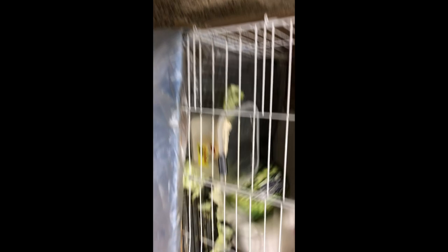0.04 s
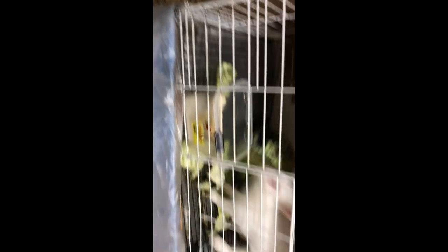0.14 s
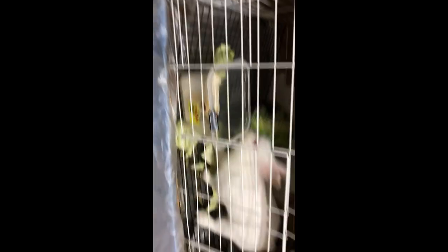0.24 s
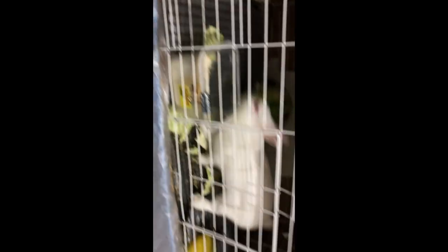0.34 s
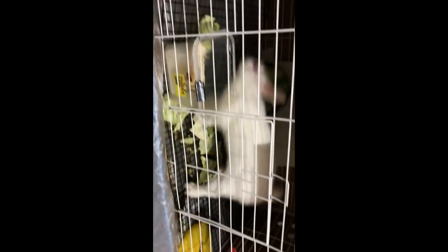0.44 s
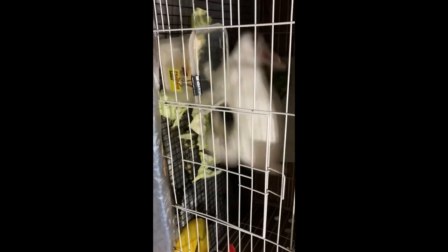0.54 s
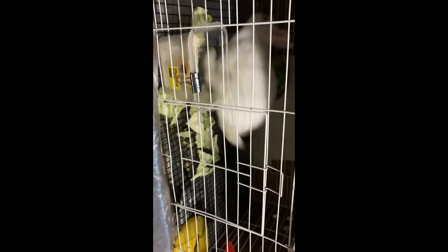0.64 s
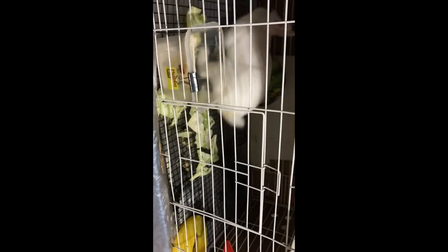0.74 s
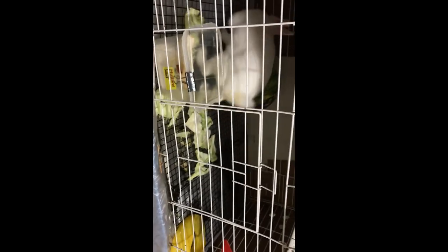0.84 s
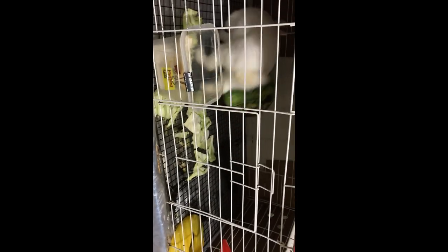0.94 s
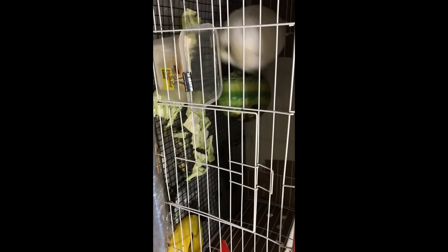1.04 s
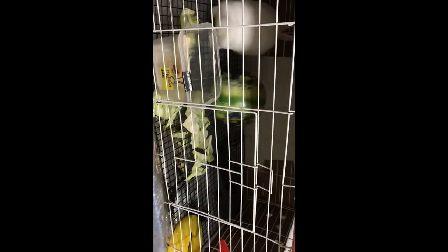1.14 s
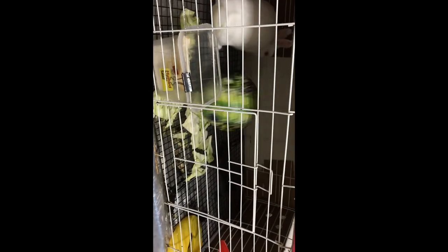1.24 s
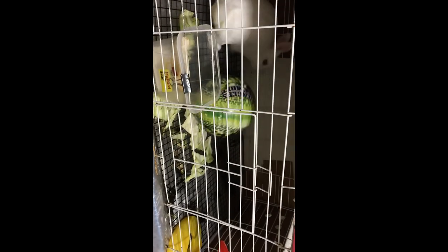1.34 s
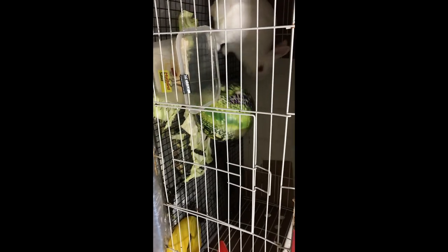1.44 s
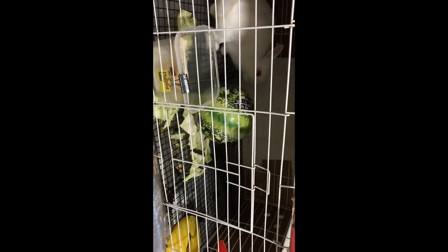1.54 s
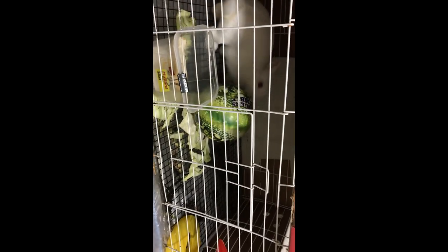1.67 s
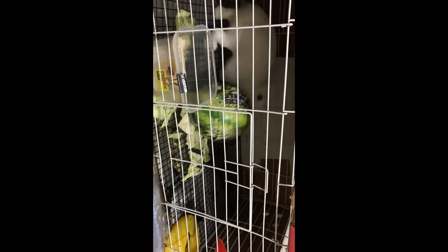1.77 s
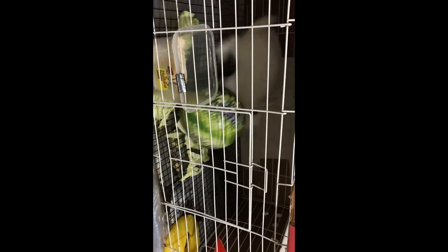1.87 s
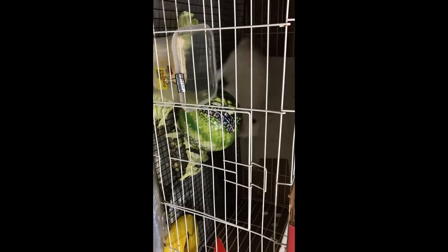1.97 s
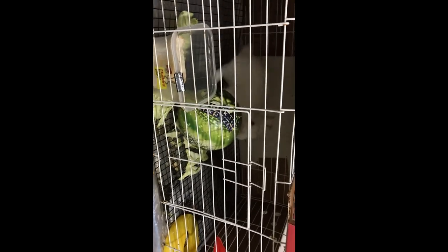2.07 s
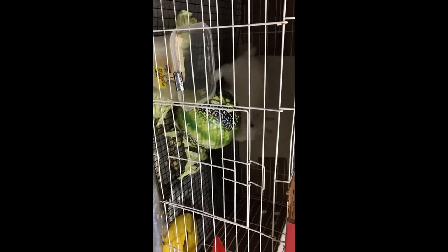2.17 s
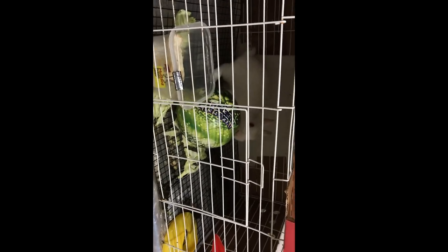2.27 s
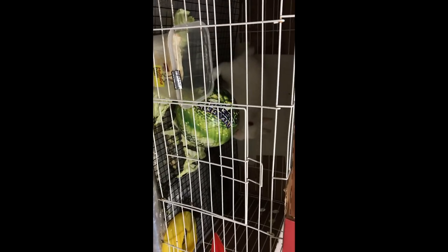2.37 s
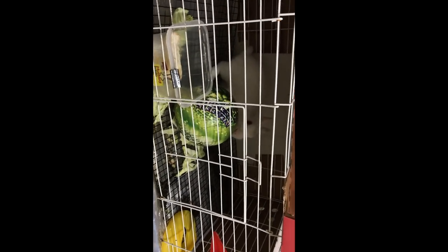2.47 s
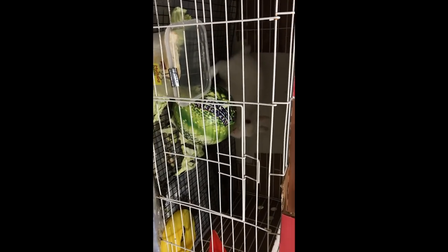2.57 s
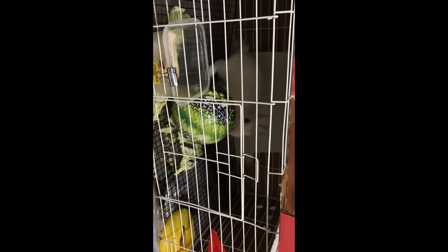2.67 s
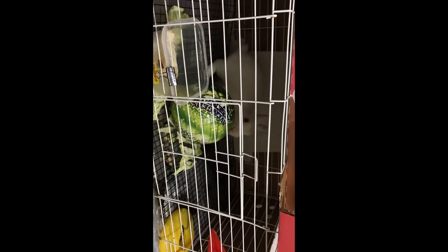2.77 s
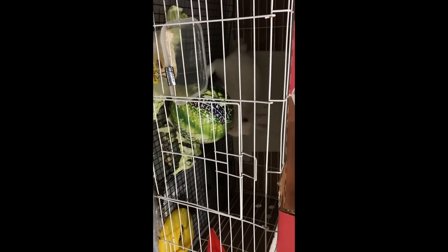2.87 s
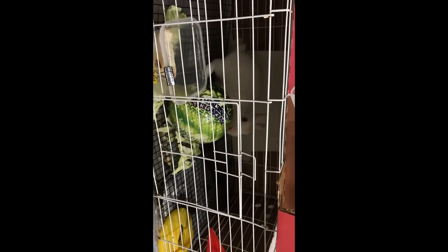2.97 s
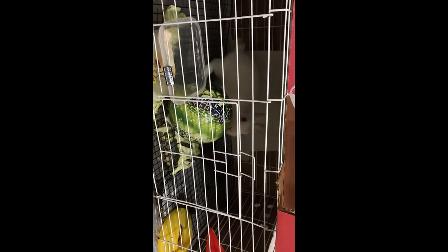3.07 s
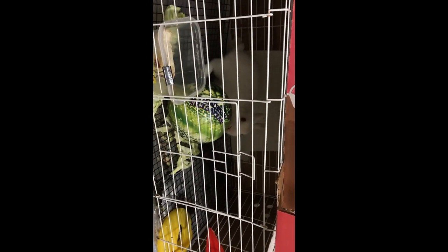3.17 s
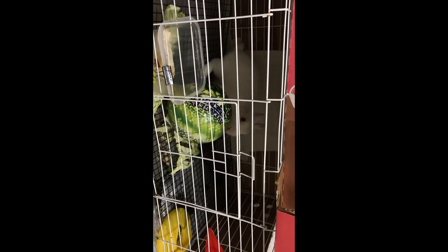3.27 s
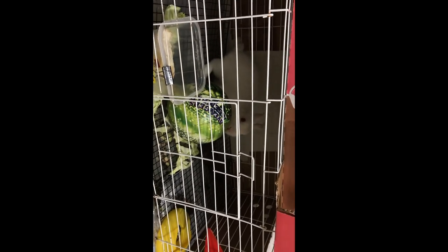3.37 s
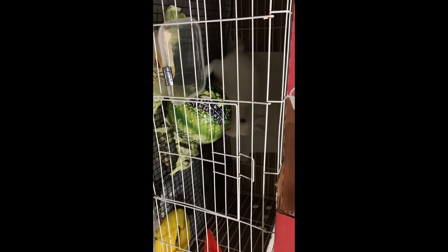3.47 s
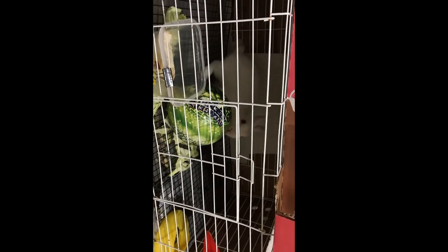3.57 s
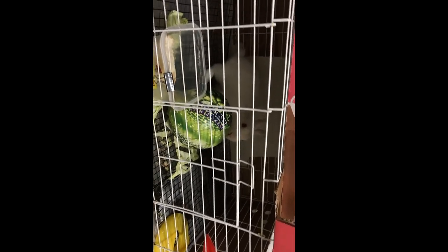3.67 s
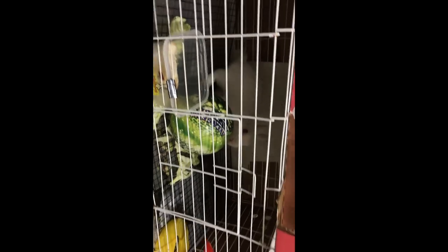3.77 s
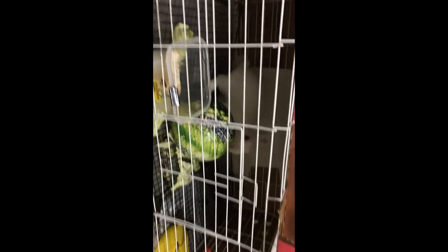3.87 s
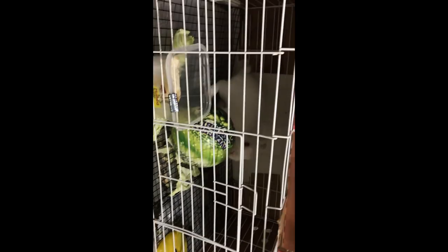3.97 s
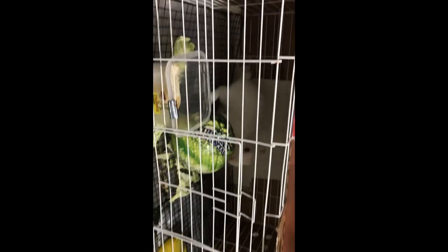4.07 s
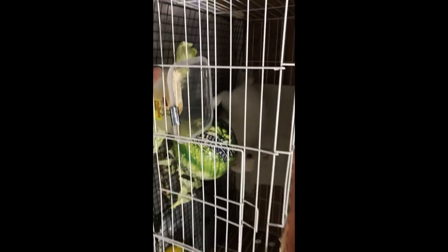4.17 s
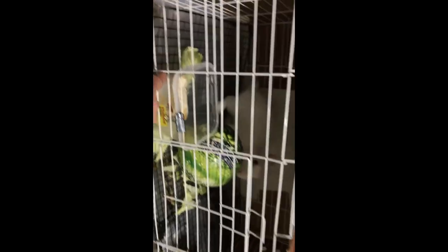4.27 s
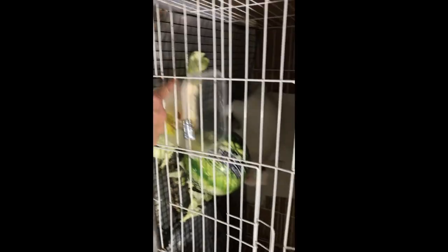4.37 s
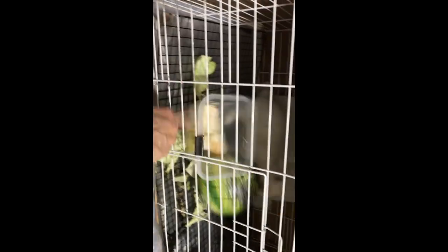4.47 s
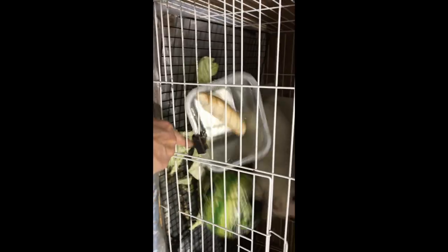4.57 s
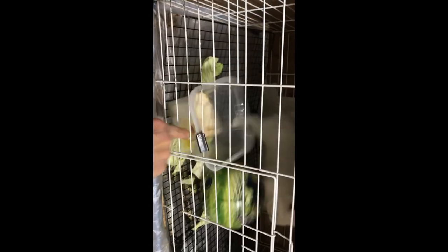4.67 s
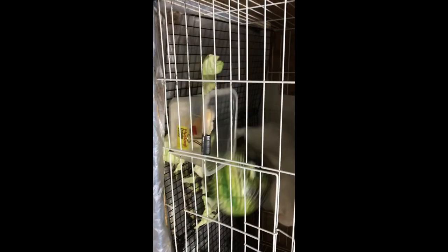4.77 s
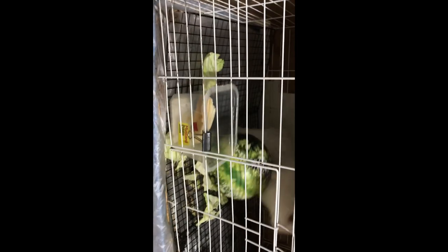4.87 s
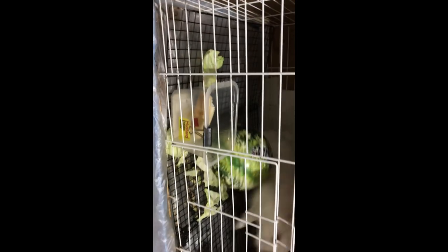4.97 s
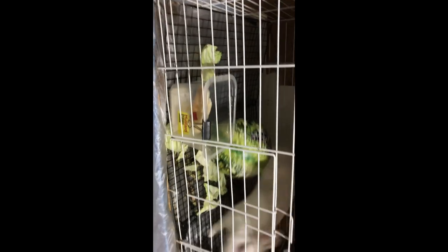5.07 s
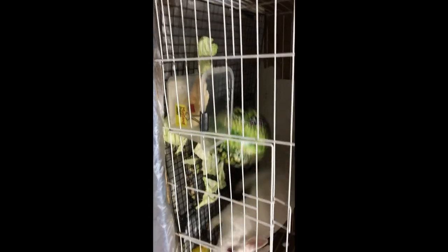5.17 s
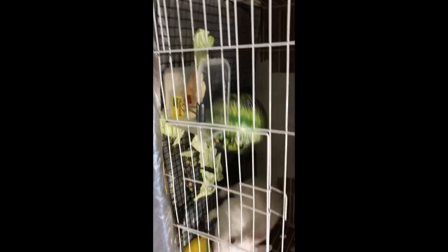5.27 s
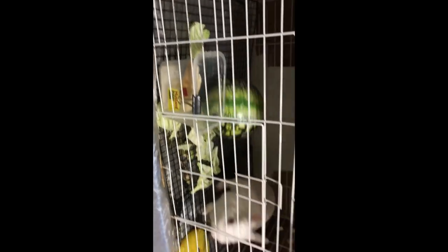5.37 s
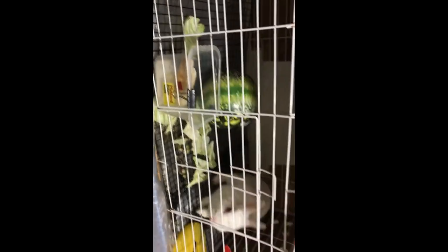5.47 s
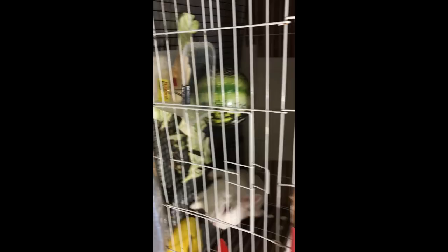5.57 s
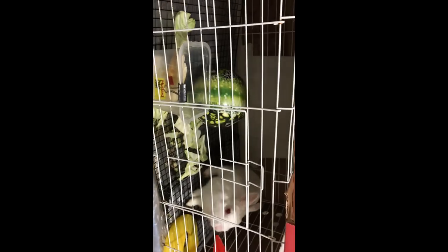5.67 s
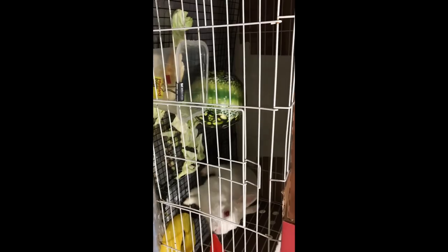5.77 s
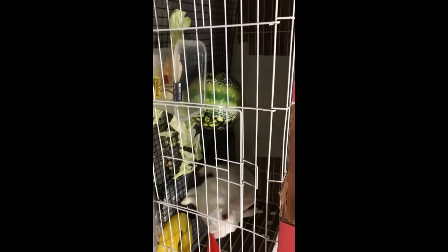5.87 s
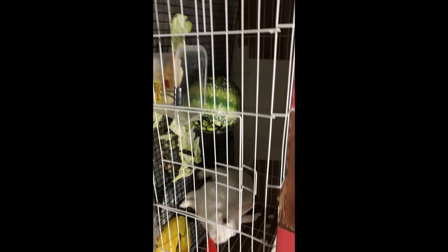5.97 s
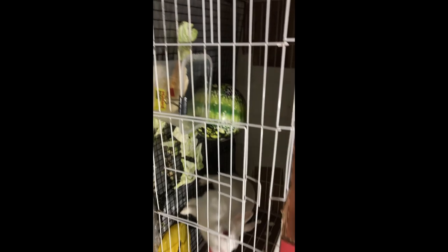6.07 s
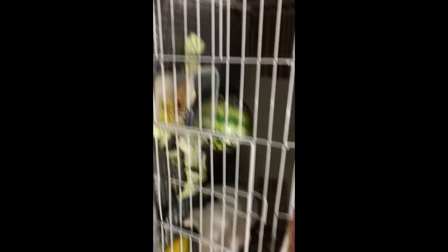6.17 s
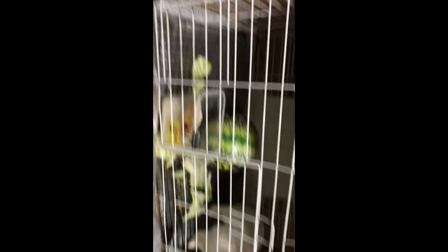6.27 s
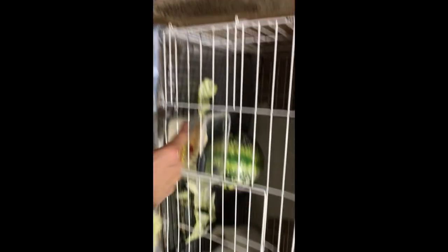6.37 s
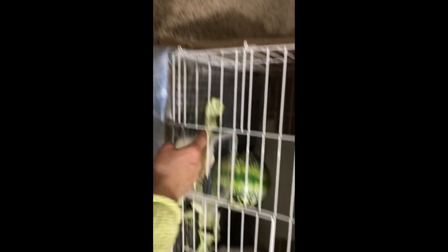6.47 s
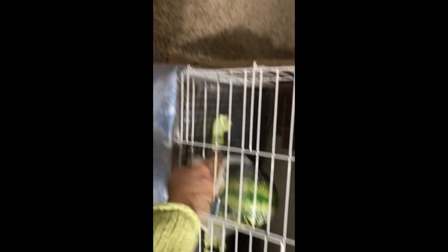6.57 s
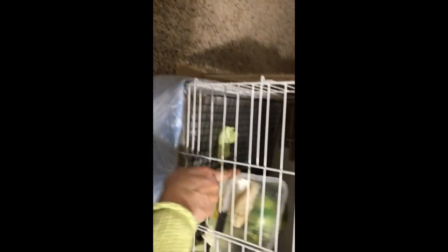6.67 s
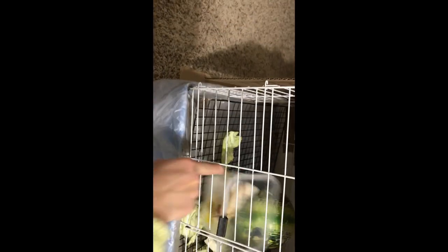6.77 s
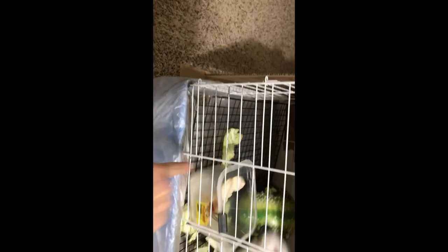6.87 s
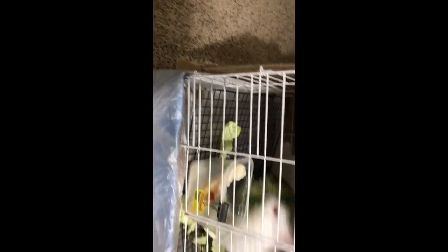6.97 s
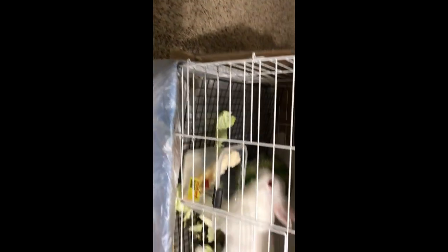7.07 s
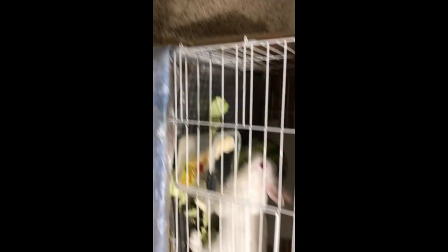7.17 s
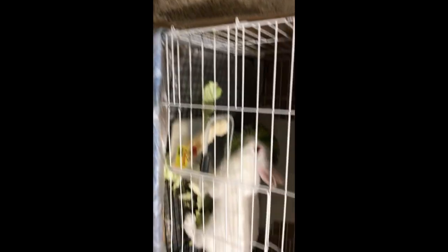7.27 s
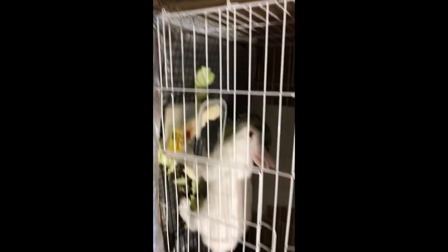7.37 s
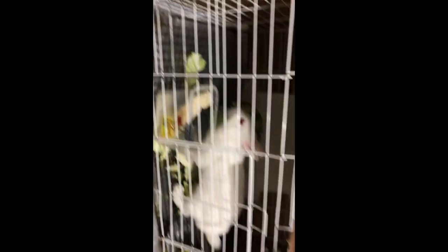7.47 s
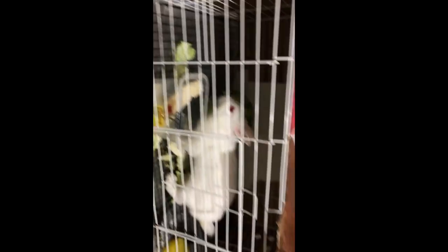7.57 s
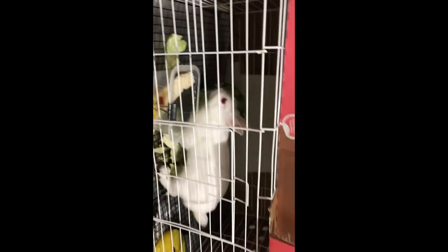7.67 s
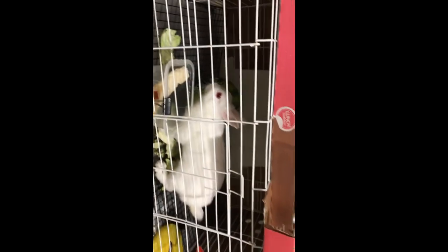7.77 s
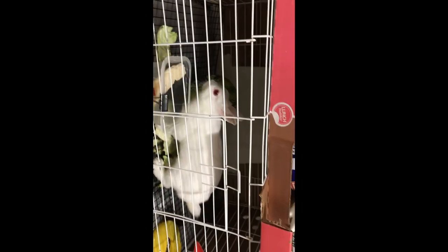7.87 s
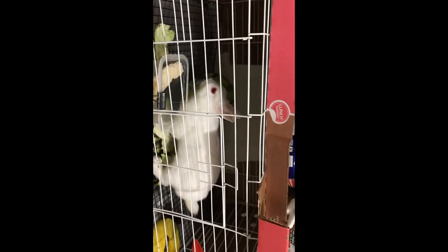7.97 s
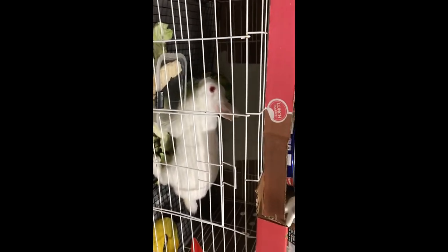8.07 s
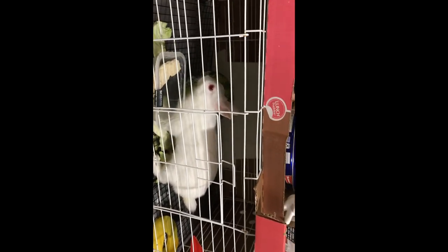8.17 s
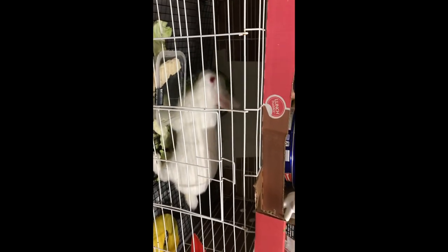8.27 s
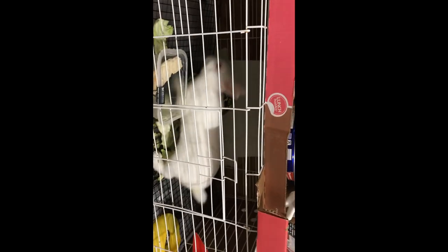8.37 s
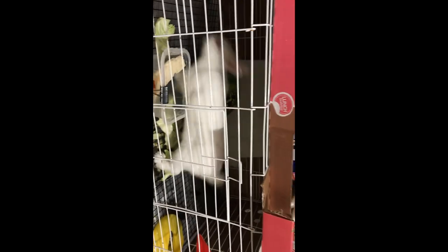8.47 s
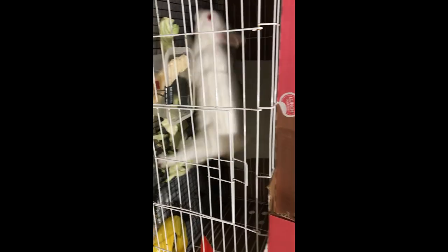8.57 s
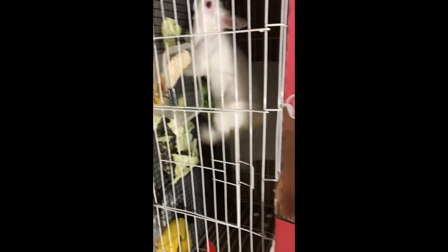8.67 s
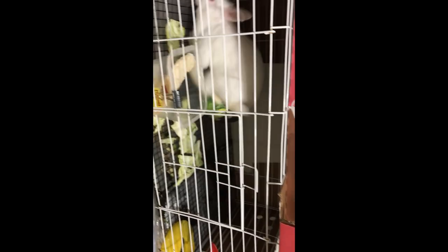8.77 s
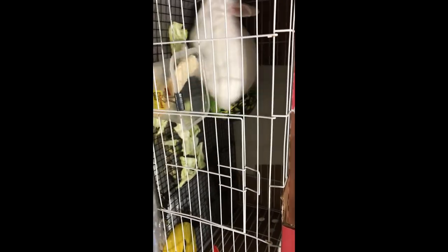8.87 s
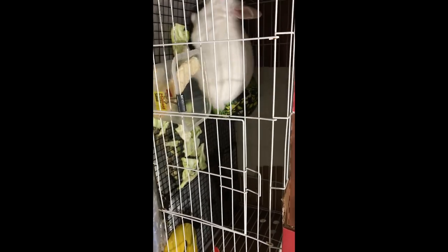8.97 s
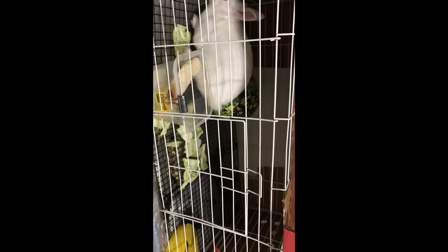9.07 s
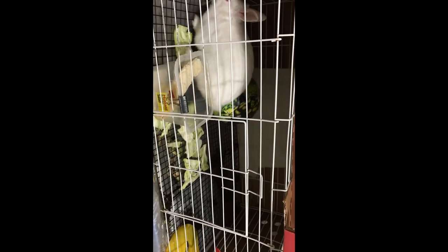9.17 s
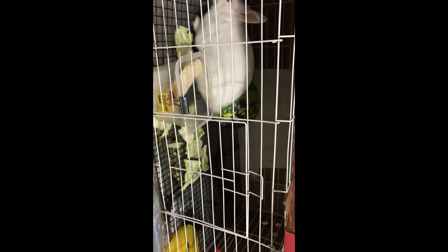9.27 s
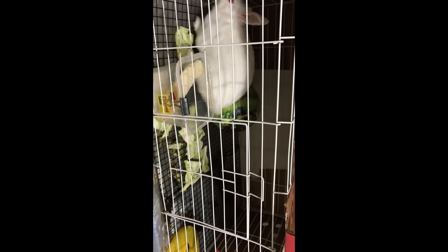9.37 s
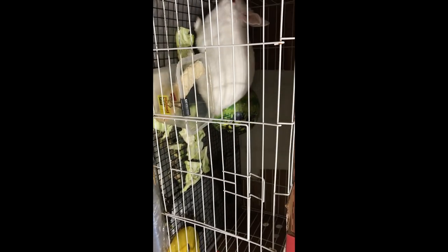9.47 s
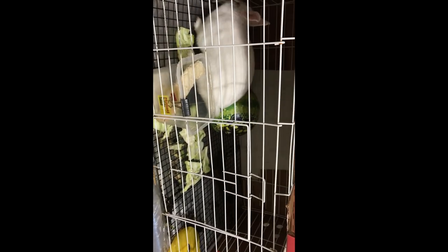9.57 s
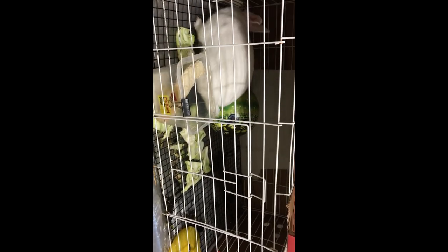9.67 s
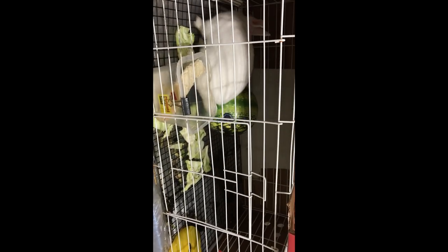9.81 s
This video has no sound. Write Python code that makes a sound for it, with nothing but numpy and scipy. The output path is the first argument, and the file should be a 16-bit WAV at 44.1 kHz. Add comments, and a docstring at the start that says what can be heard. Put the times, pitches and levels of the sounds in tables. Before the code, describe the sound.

A phone held near a cage catches short, dry wire clatter, hollow plastic knocks, sharp little ticks and crackly scratching as a rabbit jumps about. Activity opens briskly, stops, returns hard midway and again later, then ends with light rattles. Some wires hum briefly; a sleeve brushes softly in a lull; faint low hum and hiss fill the small room.

```python
"""In a quiet carpeted room, a rabbit hops about a wire cage on a plastic tray, heard through a phone close by.
Feet and a nudged food tub knock: each rough contact rings the wires, tub and tray, and some wires hum on.
A small hard part ticks when the cage jolts; tiny impacts make the scrabble of claws, fur and leaves.
A sleeve slides as shaped noise; an appliance hums as one wavering tone over low rumble and faint hiss."""
import sys
import numpy as np
from scipy import signal
from scipy.fft import rfft, irfft
from scipy.io import wavfile
from scipy.ndimage import uniform_filter1d

SR = 44100
rng = np.random.default_rng(int(sys.argv[2]) if len(sys.argv) > 2 else 0)


def to_wav(s):
    """Save 16-bit WAV."""
    ch = np.atleast_2d(s).T  # columns
    pcm = np.round(np.clip(ch, -1, 1) * 32767)  # PCM
    wavfile.write(sys.argv[1], SR, pcm.astype(np.int16))


N = 433944
SPAN = 8192  # samples in one knock or tick

# ringing tones of the plastic tray: pitch_hz, level_db, t60_s (time to fall by 60 dB)
TRAY_TONES = [(79, -19.5, 0.23), (131.4, -11.5, 0.041), (165.6, -4.5, 0.14), (202.6, 1, 0.11),
              (241, -3, 0.052), (289.3, -4.5, 0.06), (361, -5.5, 0.044)]
# ringing tones of the food tub: pitch_hz, level_db, t60_s
TUB_TONES = [(573.5, -14.5, 0.025), (623, -15.5, 0.025), (678, -6, 0.02), (793.6, -5, 0.015),
             (879, -1.5, 0.033), (998, -4.5, 0.028), (1094, -10, 0.035), (1117, -10.5, 0.035)]
# tone colour of the bare contact noise: frequency_hz, level_db
CRACK_COLOUR = [(1500, -28.5), (4000, 3), (9000, 0.5), (15000, -1.5)]


def undb(db):
    """Turn decibels into a plain multiplier."""
    return 10 ** (np.asarray(db) / 20)


def level(x, db):
    """Scale a sound to an rms (average) level in dB."""
    return x * undb(db) / np.sqrt(np.mean(x ** 2))


def colour(x, points):
    """Boost or cut each frequency along a curve through (Hz, dB) points."""
    hz, db = np.transpose(points)
    f = np.maximum(np.arange(len(x) // 2 + 1) * SR / len(x), 1)
    gain = undb(np.interp(np.log(f), np.log(hz), db))
    return irfft(rfft(x) * gain, len(x))


def rings(modes, detune=0.):
    """A struck object rings at its own pitches: one dying sine per mode, a row each."""
    hz, db, t60 = np.transpose(modes)[:, :, None]
    t = np.arange(SPAN) / SR
    decay = np.exp(-np.log(1000) * t / t60)
    return undb(db) * np.sin(2 * np.pi * hz * (1 + detune) * t) * decay


def walk(rate):
    """Smooth random wander: levels held 1 / rate seconds, then smoothed twice; spread near 1."""
    hold = int(SR / rate)
    steps = np.repeat(rng.standard_normal(N // hold + 1), hold)
    return 1.3 * uniform_filter1d(uniform_filter1d(steps, hold), hold)[:N]


def grit(rate, spread_db):
    """Tiny random impacts, rate per second on average, a few much stronger than the rest; rms 1."""
    hit = rng.random(N) < rate / SR
    strength = undb(spread_db * np.minimum(rng.exponential(size=N), 4))
    return level(hit * rng.standard_normal(N) * strength, 0)


def add(out, s, sound, peak_db):
    """Mix a sound in at s seconds with the given peak, its end faded out."""
    i = int(s * SR)
    fade = np.minimum(np.arange(SPAN)[::-1] / 2000, 1) ** 2
    scaled = fade * sound * undb(peak_db) / np.max(np.abs(sound))
    out[i:i + SPAN] += scaled[:min(SPAN, N - i)]


def struck(push, modes, tilt_db=0., scatter_db=2.5):
    """A push rings the modes; each blow lands elsewhere, so strengths, signs and pitches differ a little."""
    size, sign, shift = rng.standard_normal((3, len(modes), 1))
    strength = np.sign(sign) * undb(scatter_db * size + tilt_db)
    body = np.sum(strength * rings(modes, 0.018 * shift), axis=0)
    return signal.fftconvolve(body, push)[:SPAN]


def wire_mesh():
    """Crossing wires damp each other: many close ringing tones, all short, higher ones shorter."""
    wire_count, t60_at_3khz_s = 70, .014
    pitch_hz = 1200 + 11000 * np.sort(rng.random(wire_count)) ** 1.5
    t60_s = t60_at_3khz_s * (3000 / pitch_hz) ** .5
    return np.transpose([pitch_hz, 0 * pitch_hz, t60_s])  # all equally loud


def knocks():
    """A rough contact of a few ms cracks, rings the mesh around its brightest pitch, and thumps tray and tub."""
    # each knock: start_s, wires_peak_db, brightest_pitch_hz, tray_db (against wires), tub_db (against wires)
    knock_list = [(0.0414, -42, 1400, -8.5, 5.5), (0.1149, -21, 2555, -1.5, -6.5),
                  (0.1371, -33.5, 1982, -1, 0), (0.1963, -28.5, 1762, -9.5, -17.5),
                  (0.2632, -30.5, 3360, -34, -17), (0.295, -25.5, 3130, -18, -1.5),
                  (0.45, -34, 6600, -10, -12), (0.5778, -25, 1670, -41.5, -39),
                  (0.697, -38.5, 1344, 0.5, 4.5), (0.856, -28.5, 4970, -20, -5.5),
                  (0.903, -25.5, 1870, -24.5, -27.5), (0.9526, -38.5, 2860, -4, -13),
                  (1.0037, -46, 2900, -26, -45), (1.2293, -43.5, 6200, -29, -26),
                  (1.2482, -29.5, 2030, -18.5, -13), (1.4184, -37, 2510, -10, -13),
                  (1.4802, -37, 5300, -8, -6), (1.941, -39, 4000, -14, -22),
                  (1.954, -32.5, 1355, -5.5, -5.5), (1.9957, -30.5, 2700, -16, -8.5),
                  (2.0665, -35, 3050, -9, -11), (2.19, -55, 6000, -10, -15), (2.216, -50.5, 3140, 1, -13),
                  (3.6737, -51.5, 4440, -15, -19), (4.3233, -45, 1883, 11, -2.5),
                  (4.388, -49, 1364, 7, -2.5), (4.4929, -26, 2664, -21.5, -1.5),
                  (4.5029, -19, 1984, -27.5, -4), (4.5431, -28.5, 2220, -5.5, 3.5),
                  (4.5803, -27.5, 1430, 0.5, -1), (4.6376, -25.5, 2485, -15.5, -1),
                  (4.6483, -20, 2700, -3.5, -9.5), (4.6781, -23, 2610, -5, -10),
                  (4.692, -26, 1700, -7.5, -0.5), (4.7446, -31, 2630, -5, -2.5),
                  (4.784, -28.5, 2720, -16, 2.5), (4.8326, -18, 3140, -14, -8), (4.8888, -22, 3140, -7, -6),
                  (4.966, -41, 2900, 7, 2), (5.138, -58, 2120, -14, -14), (5.1632, -33.5, 3020, -2.5, -14),
                  (5.1868, -32, 1580, -6.5, -14), (5.238, -44, 3000, -2, -7), (5.3154, -42, 1380, -31, -9),
                  (5.3638, -45, 1480, -11, -23), (5.4467, -45.5, 1450, -24, -12),
                  (5.627, -58, 8940, -17, -14), (5.7546, -57.5, 2010, -0.5, 11.5),
                  (5.786, -63, 6020, -15, -15), (6.2112, -39.5, 1490, -28.5, -18),
                  (6.263, -48.5, 7000, -14.5, -16.5), (6.312, -57, 9000, -10.5, -0.5),
                  (6.367, -45.5, 3060, -6, -14), (6.4458, -47, 1320, -15, -7.5),
                  (6.6426, -22, 3327, -5, -7.5), (6.6529, -22, 4320, -21, -5.5),
                  (6.7169, -20, 2000, -15.5, -11), (6.724, -28, 2790, 0, -11),
                  (6.736, -18, 6970, -23, -13.5), (6.777, -44, 3130, -10.5, -15),
                  (6.8112, -39.5, 1403, -6, -6.5), (6.8555, -29, 1936, -2.5, -2.5),
                  (6.9014, -15.5, 3350, -17.5, -11.5), (6.9274, -21, 3123, -12.5, 4.5),
                  (6.9501, -16.5, 3626, -8, -12.5), (7.1543, -26, 2100, -15.5, -42),
                  (7.274, -49.5, 1480, -16, -29), (7.418, -44, 3360, -4, -9),
                  (7.4388, -40.5, 4320, -12, -5), (7.467, -33, 3230, -13, -3), (7.4824, -35.5, 1870, 3, -2),
                  (7.5057, -40, 2550, -3, -17), (7.988, -53, 1760, -29, -13.5),
                  (8.171, -62.5, 2500, -2, -18), (8.5173, -40.5, 2834, -11, -39),
                  (8.535, -44, 5000, -13, -16), (8.662, -38, 1740, -26, -31),
                  (8.685, -26.5, 1670, -26.5, -31), (8.7243, -34.5, 1464, -8, -19),
                  (8.7419, -33.5, 4000, -8, -28), (8.763, -29, 5580, -18, -17),
                  (8.7916, -26.5, 3800, -11, -19), (8.8005, -33.5, 1720, -2.5, -8),
                  (8.926, -47, 5000, -7, -21), (8.9738, -38.5, 1430, -21, -34)]
    contact_s = .0028  # typical time in which the blow dies down
    crack_db, crack_scatter_db = -12.5, .5  # against the wires
    crack_db_per_octave = 3  # brighter knocks crack harder
    out, t = np.zeros(N), np.arange(SPAN // 2) / SR
    mesh = wire_mesh()
    mesh_hz = mesh[:, 0]
    for s, db, hz, tray_db, tub_db in knock_list:
        length = contact_s * undb(2 * rng.standard_normal())
        blow_and_rattle = np.exp(-t / length) + .16 * np.exp(-t / .02)
        onset = 1 - np.exp(-t / .0004)
        push = rng.standard_normal(len(t)) * blow_and_rattle * onset
        tilt_db = -6. * np.abs(np.log2(mesh_hz / hz))[:, None]  # weaker away from the brightest pitch
        add(out, s, struck(push, mesh, tilt_db, 4.7), db)
        crack = colour(np.pad(push, (0, SPAN // 2)), CRACK_COLOUR)
        brightness_db = crack_db_per_octave * np.log2(hz / 2500)
        add(out, s, crack, db + crack_db + crack_scatter_db * rng.standard_normal() + brightness_db)
        add(out, s, struck(push, TRAY_TONES), db + tray_db)
        add(out, s, struck(push, TUB_TONES), db + tub_db)
    return out


def ticks():
    """A hard tap and its rebound 2.2 ms later ring one small part, with a short crack of noise."""
    # each tick: start_s, peak_db
    tick_list = [(0.0853, -25.5), (0.28, -22), (0.2889, -26), (0.3173, -24.5), (0.6279, -23.5),
                 (1.1172, -25), (2.0845, -25.5), (2.2737, -24.5), (7.0251, -19.5), (7.0532, -24.5),
                 (8.57, -24)]
    # ringing tones of the small part: pitch_hz, level_db, t60_s
    part_tones = [(2130, -8, .012), (2550, -7, .011), (2850, -6, .01), (3170, 0, .011), (3450, -3, .009),
                  (3750, -4, .009), (4300, -11, .008), (6900, -16, .006)]
    out = np.zeros(N)
    for s, db in tick_list:
        push = np.zeros(SPAN // 8)
        push[0], push[int(.0022 * SR)] = 1, .9
        add(out, s, struck(push, part_tones, scatter_db=1.5), db)
        crack = rng.standard_normal(SPAN) * np.exp(-np.arange(SPAN) / SR / .003)
        add(out, s, colour(crack, CRACK_COLOUR), db - 8.5)
    return out


def wire_hums():
    """Free lengths of wire are left humming: three close tones beat together as they fade."""
    # each hum: start_s, pitch_hz, level_db (of its middle tone, before it fades)
    hum_list = [(1.48, 1590, -75), (2.0, 565, -62), (4.83, 566, -57), (5.46, 565, -65.5), (5.755, 570, -74),
                (6.93, 565, -53.5), (7.47, 562, -70.5), (8.79, 565, -65), (8.885, 1590, -65.5)]
    t60_s, attack_s = 1, .0048
    out, t = np.zeros(N), np.arange(N) / SR
    for s, hz, db in hum_list:
        age = np.maximum(t - s, 0)
        fade = (1 - np.exp(-age / attack_s)) * np.exp(-np.log(1000) * age / t60_s)
        tones = np.sin(2 * np.pi * hz * age)
        tones += .5 * np.sin(2 * np.pi * (hz + 9) * age)
        tones += 1.2 * np.sin(2 * np.pi * (hz - 23) * age)
        out += undb(db) * fade * tones
    return out


def activity():
    """Gains of claws, tray and tub: scuffles start firmly, sag or grow, then loose leaves and wires settle."""
    # each scuffle: start_s, length_s, claws_and_leaves_db, tray_db (against claws), tub_db (against claws),
    # change_db (over the length; minus sags, plus grows)
    scuffles = [(0., .17, -45.5, 6, 0.5, -3.5), (0.183, 0.26, -51.5, -4, -3, -2.5),
                (0.496, 0.27, -54.5, -4.5, -6, 9), (0.806, 0.092, -44, 2, -12, -3.5),
                (0.939, 0.33, -65, -3.5, 1, -3), (1.234, 0.11, -55, -6, 1.5, -15.5),
                (1.406, 0.16, -65.5, 9, -1.5, -0.5), (1.765, 0.11, -72, -7, -5.5, 9),
                (1.831, 0.13, -58.5, -8, -5, 1), (1.927, 0.097, -47.5, -1.5, -7, -3),
                (2.07, 0.22, -58.5, 4, -1, -13), (4.325, 0.3, -63.5, 3.5, 1.5, -8),
                (4.485, 0.09, -40.5, -3, -0.5, -1.5), (4.644, 0.25, -47.5, 10.5, 0.5, -11),
                (4.792, 0.15, -40.5, 7.5, 0.5, -12), (5.131, 0.15, -53, 1, 0.5, -3),
                (5.356, 0.11, -62, 5, 0, -4), (5.741, 0.077, -77, 14.5, -10, -8),
                (6.199, 0.37, -63.5, 0, -3, -10), (6.634, 0.08, -55, 1.5, 1, -7),
                (6.802, 0.041, -47.5, 7, -1, -1), (6.902, 0.19, -43, 2, -3, -1.5),
                (7.103, 0.15, -59, 4, 2, -10), (7.329, .2, -67.5, -18, 4, 3.5),
                (8.494, 0.15, -68, -8, -5, 11), (8.658, 0.12, -55, 1, -2, 1.5),
                (8.814, 0.079, -62.5, 7, 1, -5), (8.919, 0.042, -58.5, -4, -5, 1.5)]
    attack_s, release_db_per_s = .004, 300
    settle_db, settle_db_per_s = -10.5, 70  # the quieter, slower end of each scuffle
    out, t = np.zeros((3, N)), np.arange(N) / SR
    for s, length, db, tray_db, tub_db, change_db in scuffles:
        age = t - s
        shape = np.clip(age / attack_s, 0, 1) * undb(change_db * np.clip(age / length, 0, 1))
        after = np.maximum(age - length, 0)
        release = undb(-release_db_per_s * after)
        settling = undb(settle_db - settle_db_per_s * after)
        shape = shape * np.maximum(release, settling)
        out += shape * undb(db + np.array([[0], [tray_db], [tub_db]]))
    return out


def shake(throb, modes, rate):
    """Throbbing tiny impacts, rate per second, keep an object ringing; rms 1."""
    impacts = throb * grit(rate, 2.5)
    return level(signal.fftconvolve(impacts, rings(modes).sum(0))[:N], 0)


def scrabble():
    """Streams of tiny impacts shake tray and tub and crackle in leaves and wire, throbbing together."""
    # tone colour of the crackle: frequency_hz, level_db (per Hz)
    rustle = [(710, -35), (1200, -4), (2400, -7.5), (2710, -3), (3510, -10.5), (5240, -10.5), (10500, -18),
              (13200, -15), (16000, -22.5)]
    claws, tray, tub = activity()
    throb = undb(3.5 * walk(35))
    # every scratch is a burst of noise some ms long, over a soft brushing of fur
    burst = np.exp(-np.arange(SPAN // 8) / SR / .0025)
    scratches = signal.fftconvolve(np.abs(grit(350., 3.5)), burst)[:N]
    crackle = (level(scratches, 0) + 1.1) * rng.standard_normal(N)
    crackle = level(colour(throb * crackle, [(700, -54.5)] + rustle), 0)
    tray_sound = tray * shake(throb, TRAY_TONES, 300.)
    tub_sound = tub * shake(throb, TUB_TONES, 600.)
    return tray_sound + tub_sound + claws * crackle


def sleeve():
    """A sleeve slides as an arm reaches out: smooth cloth noise swells quickly, fades slower and flutters."""
    # each slide: start_s, length_s, level_db (at its height, before the flutter)
    slides = [(3.65, 0.39, -70.5), (3.88, 0.73, -72), (5.958, 0.45, -73.5)]
    # tone colour of the cloth: frequency_hz, level_db (per Hz)
    cloth = [(600, -1), (1500, -5), (3500, -4.5), (6000, -9), (14000, -19)]
    t, swell = np.arange(N) / SR, np.zeros(N)
    for s, length, db in slides:
        progress = np.clip((t - s) / length, 0, 1)
        swell += undb(db) * np.sin(np.pi * progress ** .45)
    flutter = undb(1.3 * walk(20))
    return swell * flutter * level(colour(rng.standard_normal(N), cloth), 0)


def quiet():
    """An appliance hums as one tone, wavering slightly in pitch and level, over low rumble and hiss."""
    # tone colour of the rumble and hiss: frequency_hz, level_db (per Hz)
    noise_colour = [(12, -40), (20, -1.5), (124, -2), (147, -17.5), (174, -15.5), (273, -21.5), (583, -24),
                    (690, -29.5), (3140, -35.5), (4930, -39.5), (9410, -41), (10500, -45), (14700, -39),
                    (16500, -57)]
    hum_hz, hum_db, noise_db = 123.2, -68, -64.5  # middle pitch, rms levels
    hum = undb(2 * walk(5)) * np.sin(2 * np.pi * np.cumsum(hum_hz + walk(5)) / SR)
    noise = colour(rng.standard_normal(N), noise_colour)
    return level(hum, hum_db) + level(noise, noise_db)


def room(hits):
    """The room answers with many dense echoes: a tail of noise that dies away, duller than it began as noise."""
    t60_s, room_db = .3, -16.
    t = np.arange(SR // 2) / SR
    tail = rng.standard_normal(len(t)) * np.exp(-np.log(1000) * t / t60_s) * (t > .004)
    tail = colour(tail, [(100, 5.5), (1000, -1.0), (4000, -10.0), (14000, -12.0)])
    return signal.fftconvolve(hits, tail * undb(room_db) / np.sqrt(np.sum(tail ** 2)))[:N]


def scene():
    """Add all the layers; only knocks, ticks and wire hums are sent to the room echo."""
    hits = knocks() + ticks() + wire_hums()
    return (hits + room(hits) + scrabble() + sleeve() + quiet())[None]


def record(dry):
    """The phone cuts the deep bass (below 55 Hz) and the top (above 16 kHz)."""
    low_cut = signal.butter(N=3, Wn=55., btype="high", fs=SR, output="sos")
    top_cut = signal.ellip(8, .2, 70, 16000, fs=SR, output="sos")
    return signal.sosfilt(top_cut, signal.sosfilt(low_cut, dry))


dry = scene()
out = record(dry)
to_wav(out)
```